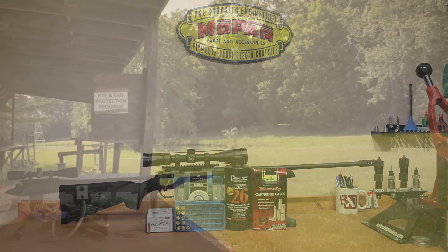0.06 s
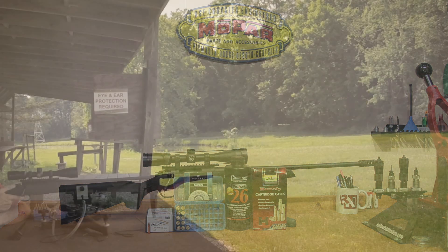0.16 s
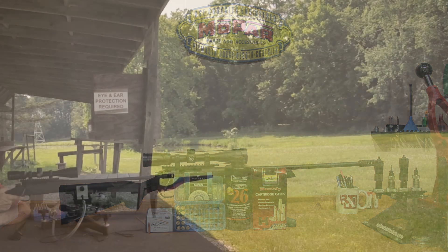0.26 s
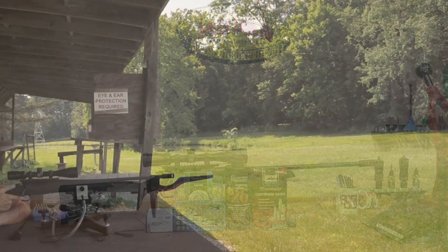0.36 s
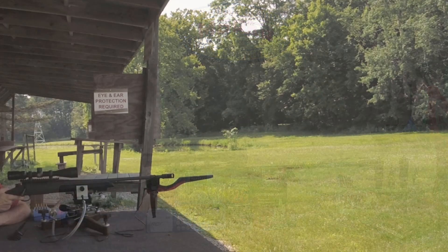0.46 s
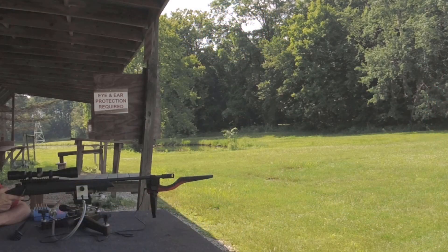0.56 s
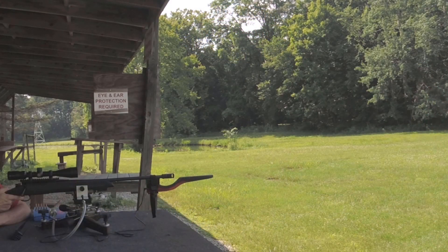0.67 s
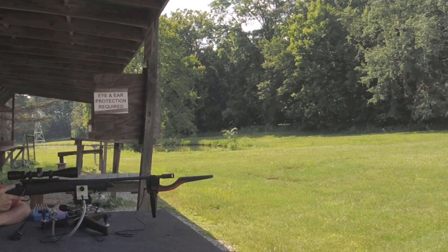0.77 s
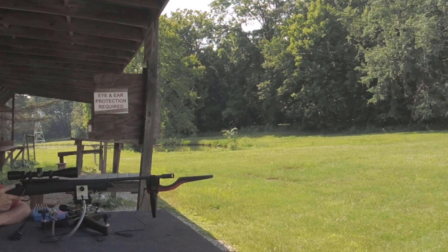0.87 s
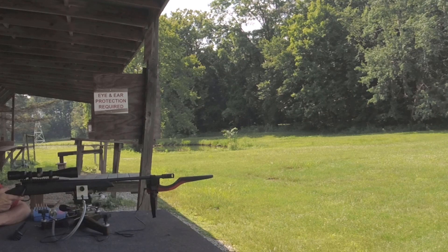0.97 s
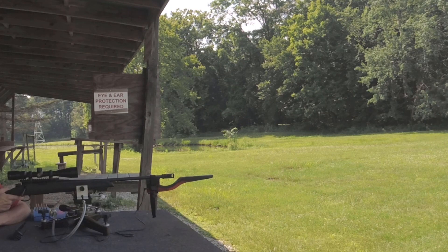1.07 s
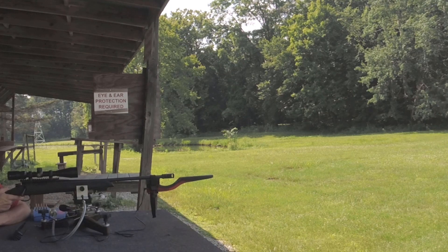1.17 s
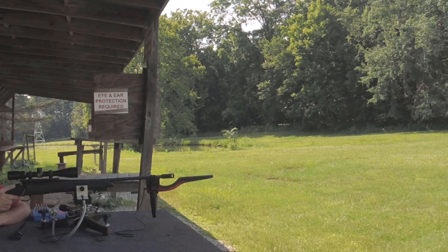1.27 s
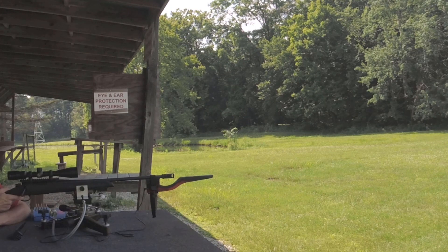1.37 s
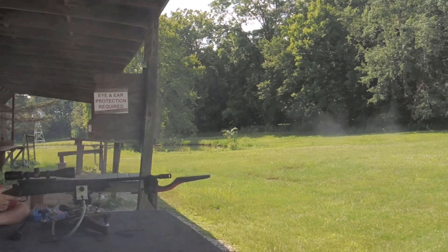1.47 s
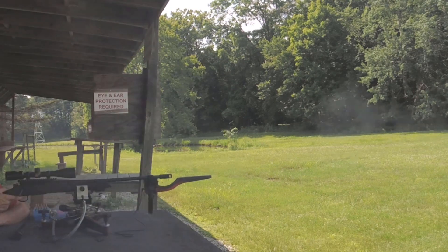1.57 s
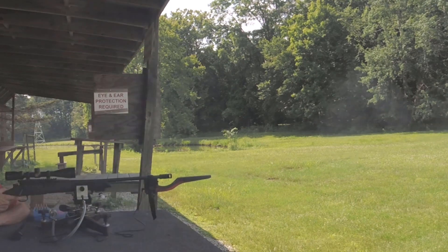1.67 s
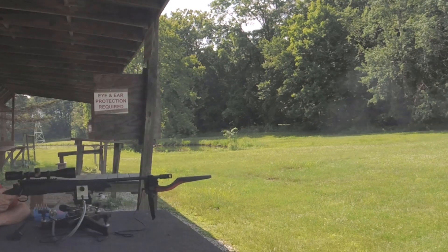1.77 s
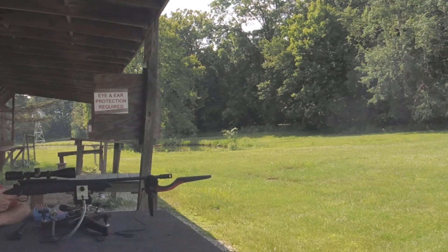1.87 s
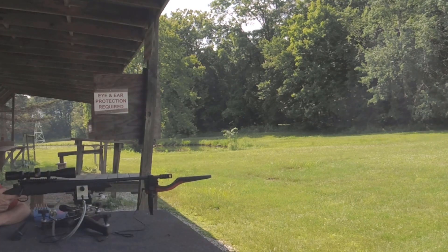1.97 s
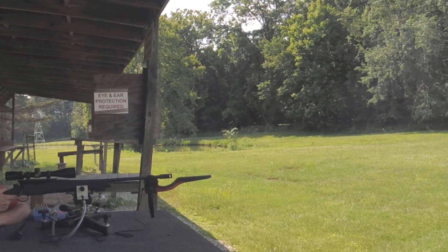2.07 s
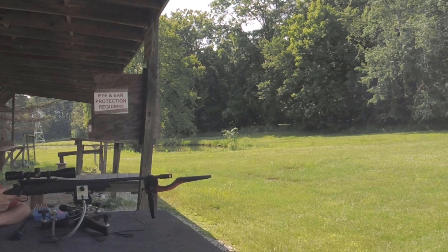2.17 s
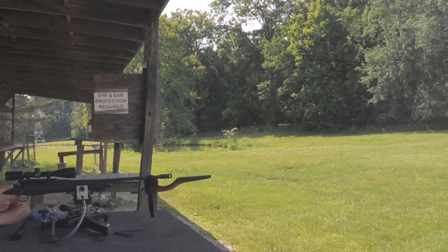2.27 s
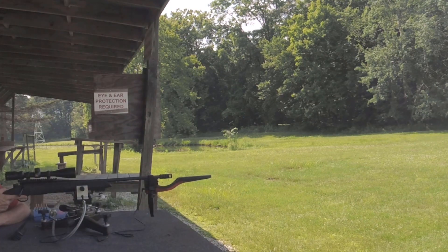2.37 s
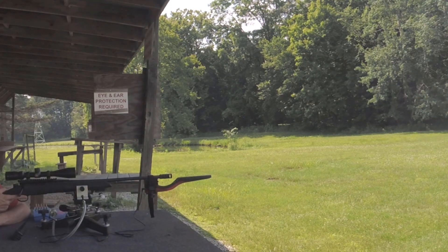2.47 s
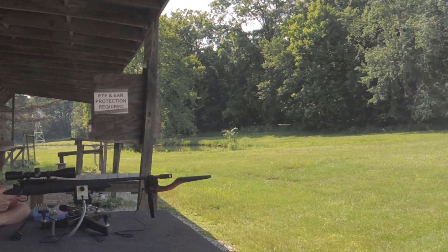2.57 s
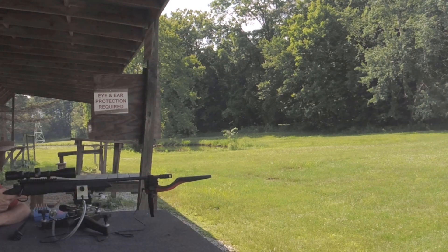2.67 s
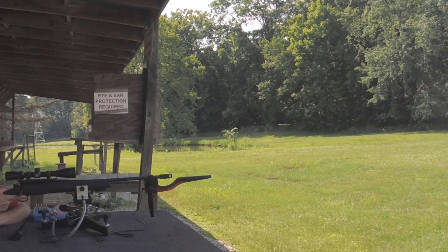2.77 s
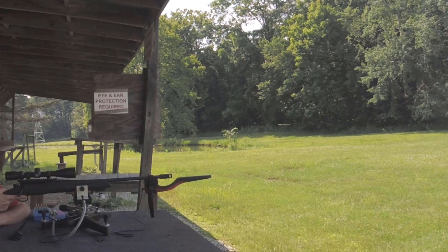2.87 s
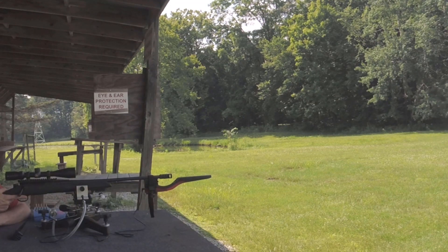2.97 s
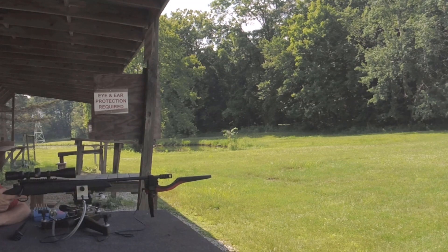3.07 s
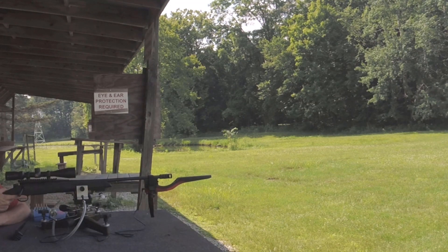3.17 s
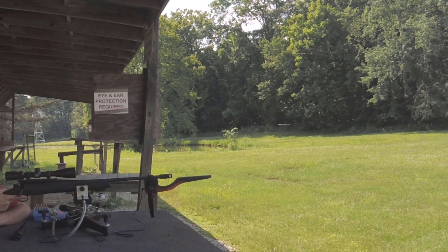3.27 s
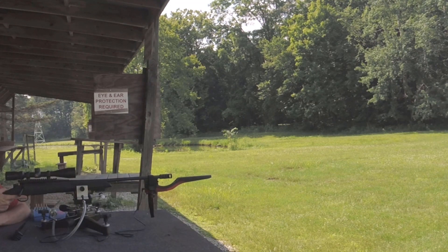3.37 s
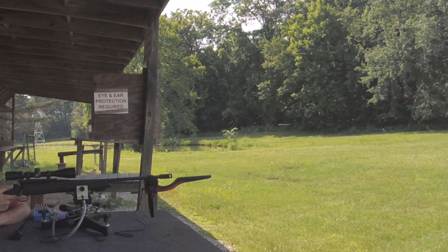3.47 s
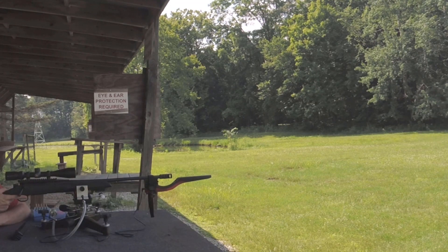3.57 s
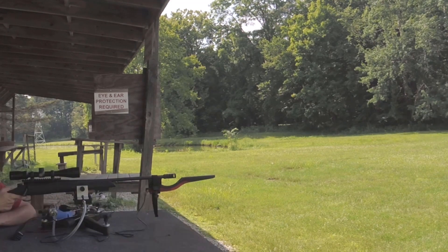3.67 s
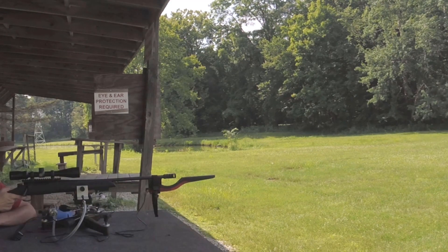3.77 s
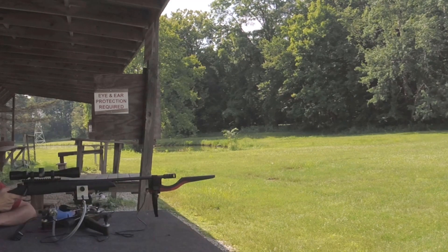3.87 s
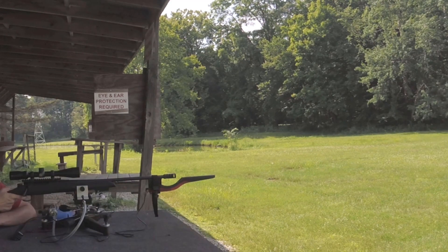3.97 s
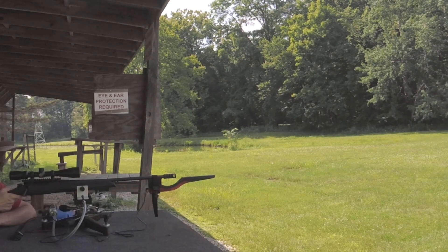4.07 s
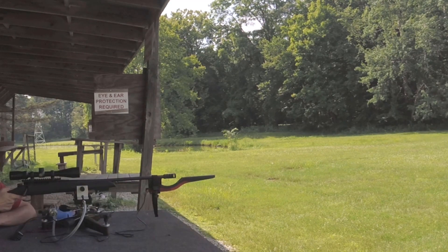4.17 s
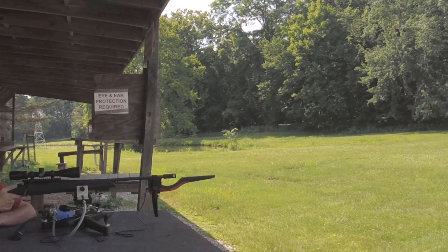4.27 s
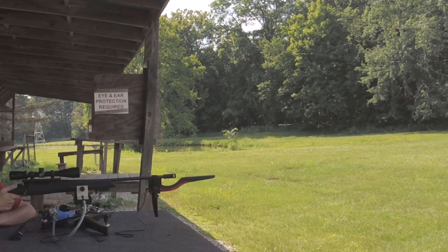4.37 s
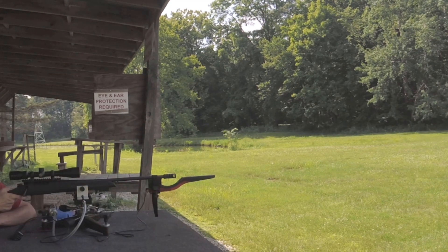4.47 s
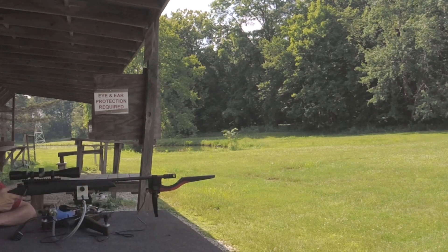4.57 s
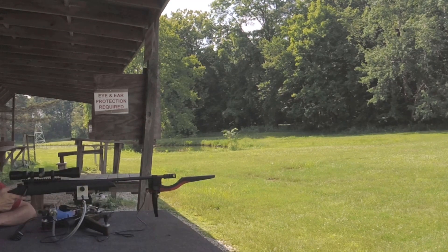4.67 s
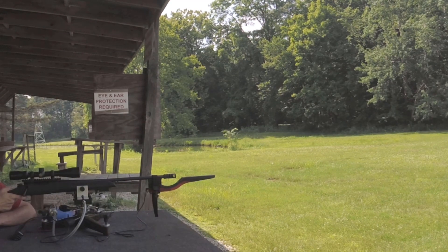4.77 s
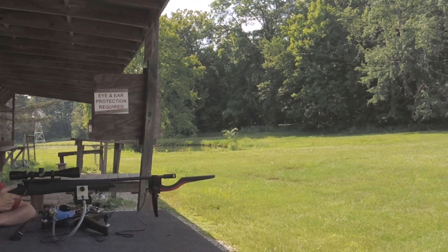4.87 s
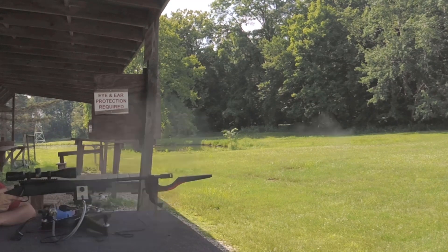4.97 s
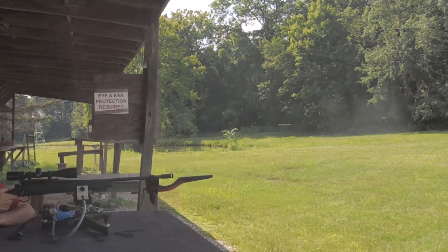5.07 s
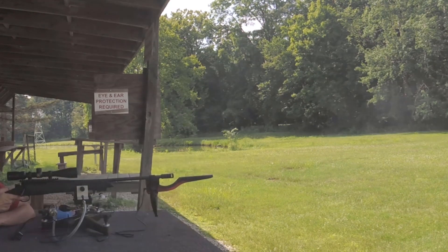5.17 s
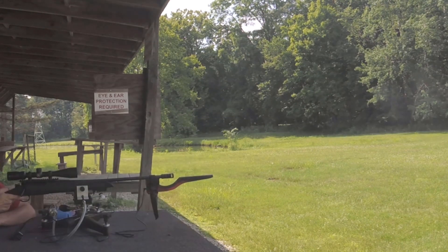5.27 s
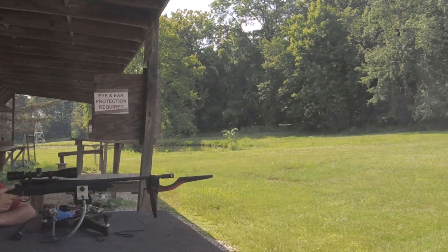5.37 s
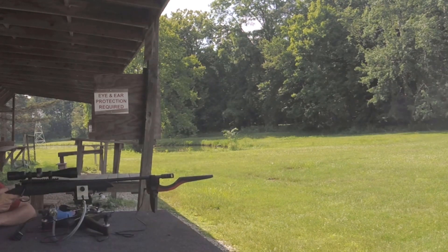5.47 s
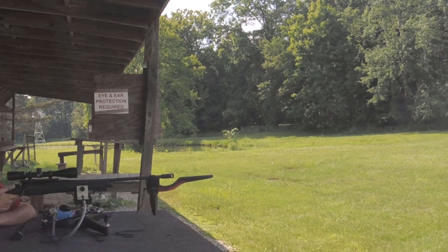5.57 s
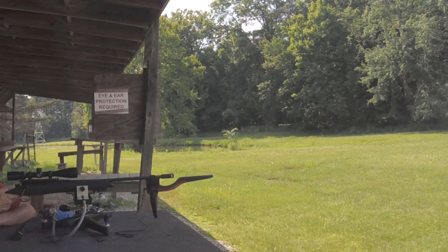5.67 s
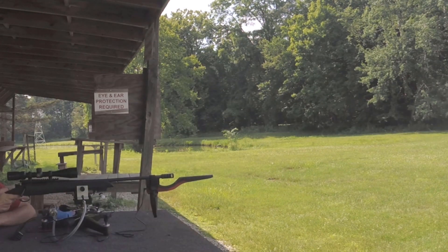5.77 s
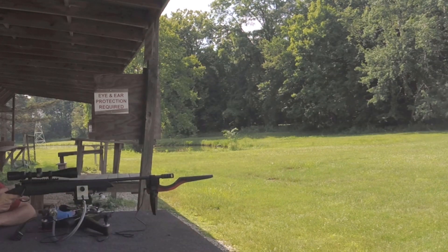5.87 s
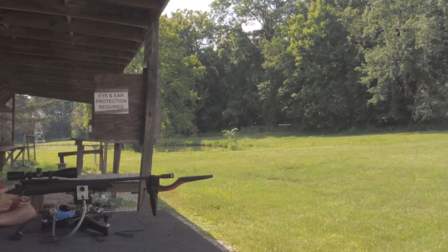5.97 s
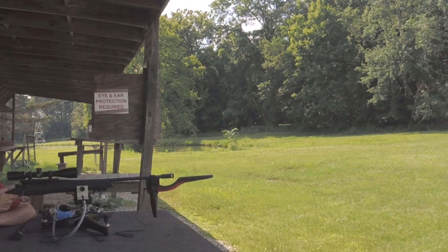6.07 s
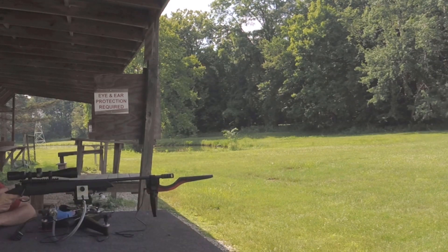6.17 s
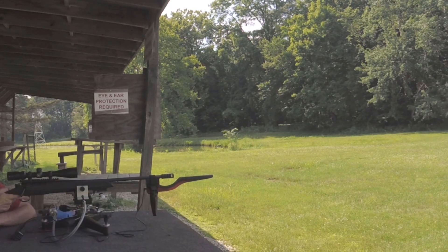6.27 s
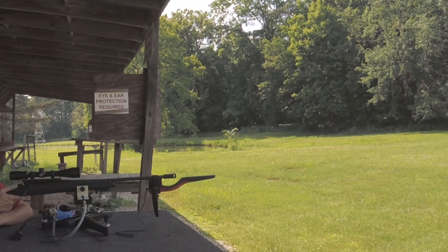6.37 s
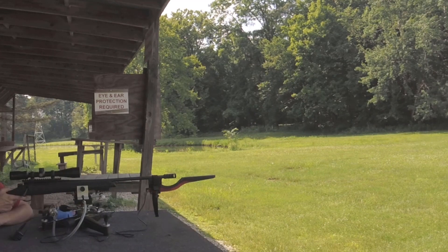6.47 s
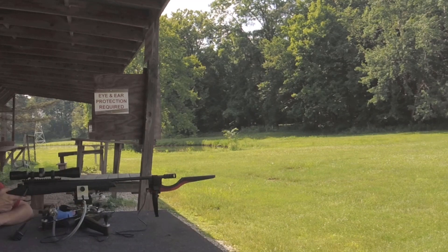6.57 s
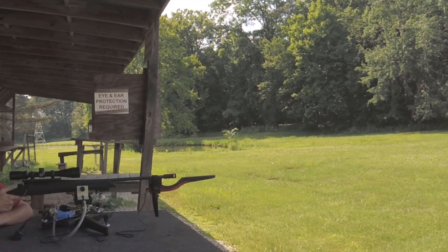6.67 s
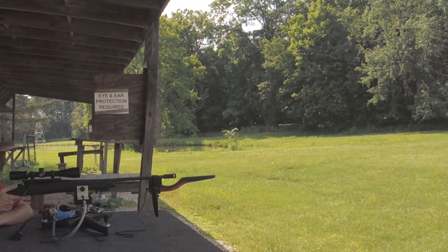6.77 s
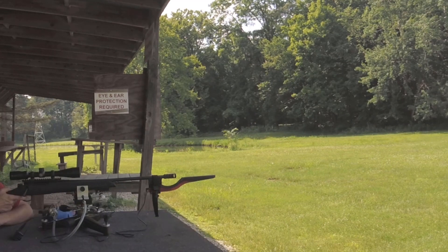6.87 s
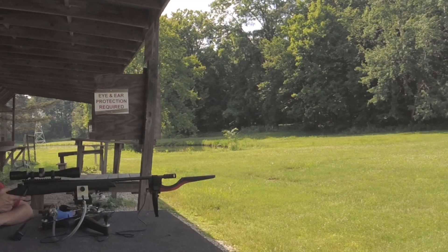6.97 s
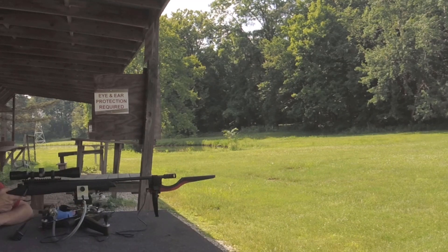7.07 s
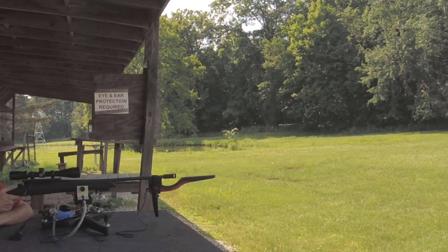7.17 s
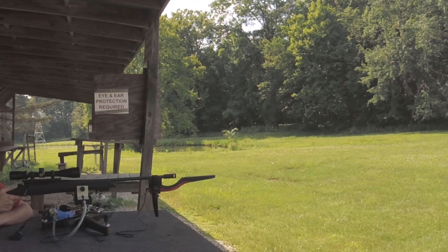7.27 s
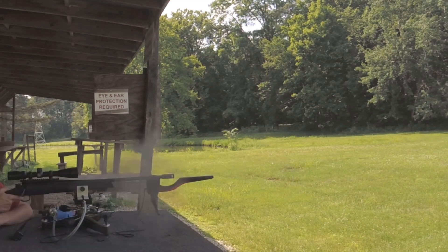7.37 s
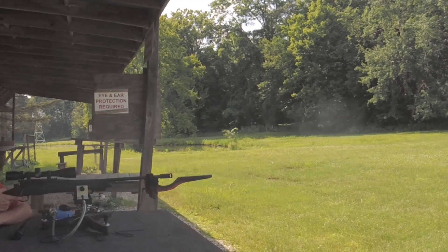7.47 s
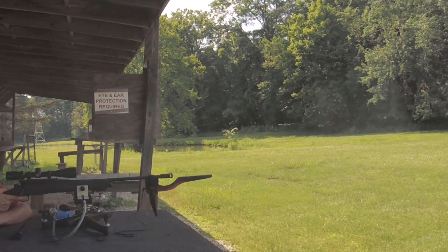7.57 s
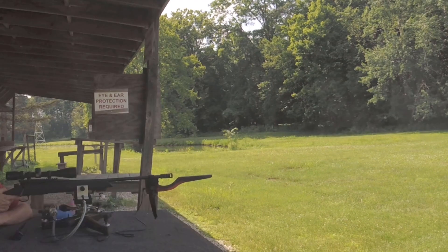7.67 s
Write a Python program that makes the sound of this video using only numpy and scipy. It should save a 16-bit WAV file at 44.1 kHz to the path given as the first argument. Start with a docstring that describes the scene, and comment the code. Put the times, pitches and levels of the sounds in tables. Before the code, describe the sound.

Mono, close to a rifle bench under a wooden shelter facing meadow and woods. The first 1.4 s are very quiet: thin hiss dipping at the start, a soft air murmur, short falling chirps, gliding whistles and faint insect tones. Just before 1.45 s, dry ticks, a rapid pulsed buzz and a low throb last a few hundredths of a second, then a bright, hard crack. Bench and roof ring briefly; scatter decays fast, the tree line answers about 0.3 s later, and a low roll trails away. Background stays sunk, with a low hum swelling from 2.5 s. At 3.7 s the air returns abruptly, with faint twittering and whistles until 4.9 s. A second, duller crack lands at 5.0 s with the same echoes. Background jumps back at 6.4 s with a faint hum and thin whine; the third crack at 7.4 s is cut off in its tail.

```python
"""Rifle shots on a meadow range

Three shots from a bench under a wooden shelter, facing a meadow edged by woods.
Ticks, a low throb and a pulsed buzz lead into each crack, a noise burst that rings bench and roof.
Banded noise makes the shelter's scatter, the tree-line echo and the far roll; a limiter flattens the peaks.
Around the shots: noise for hiss and insects, gliding tones for birds, wavering overtones for hums and a whine.
The background sinks just before each crack, creeps back and twice returns abruptly; it also dips at the start."""
import sys
import numpy as np
from scipy import signal
from scipy.fft import rfft, irfft
from scipy.io import wavfile
from scipy.ndimage import uniform_filter1d, minimum_filter1d

SR = 44100
rng = np.random.default_rng(int(sys.argv[2]) if len(sys.argv) > 2 else 0)


def wrap_up_sound(samples):
    """Save the sound to the file named by the first command line argument, as 16-bit audio."""
    columns = np.atleast_2d(samples).T
    # keep every value between -1 and 1, then stretch to whole-number steps
    tamed = np.clip(columns, -1, 1)
    steps = np.round(tamed * 32767).astype(np.int16)
    wavfile.write(sys.argv[1], SR, steps)


N = 340011

# relative spectrum of the crack and the ticks: pitch_hz [Hz], level_db [dB]
CRACK_COLOUR = [(200, -7), (900, 2), (1400, 1.5), (2000, 4), (4000, 3), (5200, -3), (6500, -2), (8500, -3),
                (11000, -15), (13000, -20.5), (15500, -31.5)]
PULSE_GAP_S = 0.00535  # pace of buzz and ticks


def amp(db):
    """Decibels to gain."""
    return 10 ** (np.asarray(db) / 20)


def unit(x):
    """Scale to rms 1."""
    return x / np.sqrt(np.mean(x ** 2))


def level_at(points, hz):
    """Gain at a frequency, read from (Hz, dB) points on a log frequency axis."""
    table_hz, db = np.transpose(points)
    return amp(np.interp(np.log(hz), np.log(table_hz), db))


def noise(points, size):
    """Noise of rms 1 with a spectrum of (Hz, dB) points."""
    f = np.maximum(np.fft.rfftfreq(size, 1 / SR), 1)
    spectrum = rfft(rng.standard_normal(size)) * level_at(points, f)
    return unit(irfft(spectrum, size))


def band(hz, width_hz, size):
    """Noise of rms 1 in a bell-shaped band."""
    f = np.fft.rfftfreq(size, 1 / SR)
    bell = np.exp(-2 * ((f - hz) / width_hz) ** 2)
    return unit(irfft(rfft(rng.standard_normal(size)) * bell, size))


def walk(rate_hz):
    """Slow random wander of rms 1, mostly slower than the given rate."""
    return band(0, rate_hz, N)


def burst(points, envelope):
    """A short noise burst with the envelope's rms, its spectrum evened out to (Hz, dB) points."""
    size = len(envelope)
    f = np.maximum(np.fft.rfftfreq(size, 1 / SR), 1)
    x = rng.standard_normal(size)
    # keep the phases of the enveloped noise, which hold its timing, and reset the levels
    for _ in range(4):
        phase = np.angle(rfft(x * envelope))
        x = irfft(level_at(points, f) * np.exp(1j * phase), size)
    x = x * np.minimum(10 * envelope, 1)  # silence the far tails
    return unit(x) * np.sqrt(np.mean(envelope ** 2))


def gate(t, start, end, edge=0.0027):
    """1 between two times, with short ramps inside them."""
    return np.clip((t - start) / edge, 0, 1) * np.clip((end - t) / edge, 0, 1)


def add(out, at, x):
    """Mix x into out from a time on."""
    i = int(round(at * SR))
    out[i:i + len(x)] += x[:len(out) - i]


def background(drop_db=-37, drop_s=0.054, return_db_per_s=11.0, flutter_db=-0.1, floor_db=-94,
               lull_db=-90.5, lull_rise_db_per_s=19, lull_top_db=-58):
    """Hiss and distant traffic murmur sink and creep back, while a low rumble swells in the lull."""
    # stretches, each lasting until the next: start_s [s], drop_s [s], air_db [dB rms], rumble_db [dB rms],
    # both levels before the drop and flutter
    stretches = [(0, 0.09, -69.5, -69.5), (0.141, 1.41, -56.5, -84), (3.675, 4.963, -60, -100),
                 (6.38, 7.382, -54.5, -91)]
    # relative spectra of the air in turn and of the rumble: pitch_hz [Hz], level_db [dB]
    thin_air = [(100, 3), (1500, -31), (2500, -3), (4800, -6), (5600, -12), (15000, -15)]
    air_a = [(30, -34.5), (89, -37.5), (108, -19), (167, 0.5), (260, -12.5), (460, -23.5), (800, -26.5),
             (2000, -32), (3200, -35.5), (4500, -47.5), (5800, -45.5), (6700, -35.5), (11500, -43.5),
             (15000, -44.5)]
    air_b = [(30, -23.5), (108, -28.5), (135, 3), (300, -11.5), (520, -16), (1100, -21), (3500, -29.5),
             (4600, -43.5), (5600, -39.5), (6800, -29), (9500, -32.5), (11800, -39), (13000, -35.5),
             (15000, -38)]
    air_c = [(30, -29), (110, -41.5), (148, 0.5), (185, -3.5), (260, -13.5), (520, -21), (1300, -24.5),
             (2450, -26), (3500, -37), (4800, -46.5), (5800, -46.5), (6800, -37), (11500, -45),
             (15000, -45)]
    rumble_colour = [(20, -3), (50, 0.5), (110, 2.5), (200, -12), (400, -16), (1000, -22), (3000, -44.5),
                     (8000, -59), (15000, -49.5)]
    t = np.arange(N) / SR
    rumble = noise(rumble_colour, N)
    ends = [row[0] for row in stretches[1:]] + [N / SR]
    # a steady faint hiss from the second stretch on
    out = amp(floor_db) * noise([(100, 2.0), (15000, -18)], N) * gate(t, ends[0], ends[-1])
    colours = (thin_air, air_a, air_b, air_c)
    for (start, drop, air_db, rumble_db), end, colour in zip(stretches, ends, colours):
        since = t - drop
        sunk_db = np.minimum(drop_db + return_db_per_s * since, 0) * np.clip(since / drop_s, 0, 1)
        air = amp(air_db) * noise(colour, N) + amp(rumble_db) * rumble
        out += air * gate(t, start, end) * amp(sunk_db + flutter_db * walk(8))
        if start > 0:
            swell_db = np.minimum(lull_db + lull_rise_db_per_s * since, lull_top_db)
            out += rumble * gate(t, drop, end) * amp(swell_db)
    return out


def twitter(from_s=3.7, to_s=4.85, centre_hz=3468, db=-80.5, length_s=0.05,
            spread=0.14, glide=0.12, count=8):
    """Scattered short notes that glide up or down: (s, length s, start Hz, end Hz, dB)."""
    notes = []
    for k, (when, pitch, slope) in enumerate(rng.random((count, 3))):
        at = from_s + (to_s - from_s) * (k + when) / count  # one at random in each equal slot
        hz = centre_hz * (1 + spread * (2 * pitch - 1))
        notes.append((at, length_s, hz, hz * (1 + glide * (2 * slope - 1)), db))
    return notes


def birds(bend=2.2, waver=0.0029, wet_db=0, t60=0.3):
    """Chirps, slurs, whistles and twitter: gliding tones, blurred by the trees they come from."""
    # one bird's short falling chirp, another's high downward slur: start_s [s], level_db [dB before swell, blur]
    chirp_times = [(0.324, -73), (0.585, -72), (0.87, -74), (1.204, -74)]
    slur_times = [(3.415, -94), (4.65, -81)]
    # short and longer gliding whistles: start_s [s], length_s [s], start_hz [Hz], end_hz [Hz],
    # level_db [dB before swell and blur]
    whistles = [(0.145, 0.28, 3340, 3880, -77), (0.44, 0.12, 3800, 4020, -73.5),
                (.29, 0.13, 3615, 3584, -72), (0.37, 0.15, 3070, 3027, -72), (4.15, 0.354, 3375, 3350, -84),
                (4.685, 0.088, 1870, 1990, -75), (4.86, .11, 4030, 4480, -85)]
    out, wobble = np.zeros(N), 1 + waver * walk(80)
    chirps = [(at, 0.044, 3000, 2520, db) for at, db in chirp_times]  # length s, start Hz, end Hz
    slurs = [(at, 0.11, 6250, 5400, db) for at, db in slur_times]
    for at, length, start_hz, end_hz, db in chirps + slurs + list(whistles) + twitter():
        u = np.linspace(0, 1, int(length * SR))
        # the glide is steepest at the start of the note
        hz = (end_hz + (start_hz - end_hz) * (1 - u) ** bend) * wobble[int(at * SR):][:len(u)]
        swell = np.sqrt(2 * abs(np.sin(np.pi * u)))
        add(out, at, amp(db) * swell * np.sin(2 * np.pi * np.cumsum(hz) / SR))
    t = np.arange(SR // 2) / SR
    trees = rng.standard_normal(len(t)) * np.exp(-np.log(1000) * t / t60)
    blur = signal.fftconvolve(out, trees / np.linalg.norm(trees))[:N]
    return out + amp(wet_db) * blur


def insects(width_hz=45, from_s=0.22, to_s=1.41):
    """Thin flickering tones from the meadow: narrow noise bands, ending just before the first crack."""
    # singing tones: pitch_hz [Hz], level_db [dB rms]
    tones = [(3127, -82.5), (2410, -82.5)]
    t = np.arange(N) / SR
    song = sum(amp(db) * band(hz, width_hz, N) for hz, db in tones)
    return gate(t, from_s, to_s) * song


def throb(hz=140, db=-11, full_s=0.02, curve=1.4):
    """A low tone that swells over the last few hundredths of a second before the crack."""
    lead = 0.0435  # s ahead of the crack
    t = np.arange(int((lead + 0.002) * SR)) / SR
    swell = np.minimum(t / full_s, 1) ** curve
    fade = np.clip((t[-1] - t) / 0.0056, 0, 1)
    return lead, amp(db) * swell * fade * np.cos(2 * np.pi * hz * t)


def ticks(db=-28, decay_s=0.0015, body_db=-34, body_s=0.028, later_db=-9):
    """Two dry ticks and two softer ones open the buzz at the same pace, each with a dull body."""
    body_colour = [(70, -21.5), (250, -3.5), (550, -2), (1500, -9), (4000, -24.0), (15000, -49)]  # Hz, dB
    t = np.arange(4096) / SR
    rows = []
    for k in range(5, 9):  # pulse gaps ahead of the crack
        tick = amp(db + later_db * (k < 7)) * burst(CRACK_COLOUR, np.exp(-t / decay_s))
        body = noise(body_colour, len(t)) * np.exp(-t / body_s)
        rows.append((k * PULSE_GAP_S, tick + amp(body_db) * body))
    return rows


def buzz(strong_db=-24, weak_db=-28, spread_s=0.0039, rough=0.55,
         zing_hz=6200, zing_db=-23, zing_s=0.002, early_db=-11):
    """Nearly alike pulses, strong and weak in turn, the earliest two fainter; strong ones carry a thin zing."""
    # relative spectrum of a pulse: pitch_hz [Hz], level_db [dB]
    pulse_colour = [(150, -0.5), (600, -7.5), (1200, -10), (1900, 4), (2700, -1), (3400, 0), (3900, 6),
                    (4400, -7.5), (5500, -13), (7500, -27.5), (11000, -35.5), (15000, -42.5)]
    t = np.arange(-512, 512) / SR  # centred on the pulse
    envelope = np.exp(-abs(t) / spread_s) * np.hanning(len(t))
    common = burst(pulse_colour, envelope)
    zing = np.sin(2 * np.pi * zing_hz * t) * np.exp(-(t / zing_s) ** 2)
    rows = []
    for k in range(7):  # pulse gaps ahead of the crack
        pulse = (common + rough * burst(pulse_colour, envelope)) / np.hypot(1, rough)
        if k % 2:
            pulse = amp(weak_db) * pulse
        else:
            pulse = amp(strong_db) * pulse + amp(zing_db) * zing
        rows.append((k * PULSE_GAP_S - t[0], pulse * amp(early_db * (k > 4))))
    return rows


def blast(bright_db, crack_db=4.0, crack_s=0.0014, ring_lag_s=0.0005):
    """The muzzle blast: a sharp burst of gas noise of given brightness, then the ring of bench and roof."""
    # decaying modes of bench and roof: pitch_hz [Hz], level_db [dB], t60_s [s]
    modes = [(157, -12.5, 0.082), (242, -31, 0.4), (296.5, -42, 0.9), (385, -29.5, 0.21),
             (432.6, -32.5, 0.25), (507, -3, 0.013), (886.5, -1, 0.0067), (2115, -16.5, 0.0093)]
    t = np.arange(32768) / SR
    late = np.maximum(t - ring_lag_s, 0)
    ring = sum(amp(db) * np.sin(2 * np.pi * hz * late) * np.exp(-np.log(1000) * late / t60)
               for hz, db, t60 in modes)
    front = np.minimum(t / 0.0001, 1)
    colour = [(hz, db + bright_db * np.log2(hz)) for hz, db in CRACK_COLOUR]
    return amp(crack_db) * burst(colour, front * np.exp(-t / crack_s)) - ring


def reflections(shelter_s=0.0087, build_s=0.00015, woods_spread=0.22, patchy_db=1.2, size=131072):
    """Roof and posts scatter the blast at once, the tree line answers later, and the far land rolls on."""
    # levels per half octave before their envelopes, for shelter, woods and far land:
    # pitch_hz [Hz], level_db [dB rms]
    shelter_colour = [(30, -51.5), (55, -42), (90, -46.5), (160, -24), (300, -25.5), (700, -22),
                      (1800, -25.5), (3500, -31.5), (7700, -39.5), (11000, -49)]
    woods_colour = [(30, -74), (55, -59), (92, -68.5), (152, -48), (300, -62), (700, -54.5), (1800, -67.5),
                    (3500, -65.5), (7700, -79.5), (11000, -104)]
    roll_colour = [(30, -91), (55, -81.5), (92, -82), (152, -64.5), (300, -85), (700, -67.5), (1800, -74),
                   (2800, -70), (4200, -74), (7700, -83), (11000, -113)]
    # the tree line's answer; mid pitches reach deepest into the wood: pitch_hz [Hz], delay_s [s]
    woods_delay = [(150, 0.30), (800, 0.37), (3500, 0.31)]
    # distinct returns from downrange: delay_s [s], centre_hz [Hz], level_db [dB], decay_s [s]
    returns = [(.127, 3780, -59, .0015), (0.159, 325, -39.5, 0.0069)]
    # the shelter's scatter dies as a power of time, faster in the treble
    fall_at_1khz, fall_per_octave = 1.496, 0.12
    # the far roll lasts long in the bass; the air shortens it towards the treble
    bass_t60_s, treble_t60_s, air_damp_hz = 13.9, 1.4, 1740
    t = np.arange(1, size + 1) / SR
    clumps = amp(patchy_db * band(0, 57, size))  # trunks and crowns answer in clumps
    out = np.zeros(size)
    delay_hz, delays = np.transpose(woods_delay)
    for hz in 30 * 2 ** (np.arange(19) / 2):  # half-octave bands
        fall = fall_at_1khz + fall_per_octave * np.log2(hz / 1000)
        delay = np.interp(np.log(hz), np.log(delay_hz), delays)
        t60 = treble_t60_s + (bass_t60_s - treble_t60_s) * np.exp(-(hz / air_damp_hz) ** 2)
        build = 1 - np.exp(-t / build_s)
        shelter = level_at(shelter_colour, hz) * build * (1 + t / shelter_s) ** -fall
        # trees at many depths smear their echo into a swell
        smear = np.exp(-0.5 * (np.log(t / delay) / woods_spread) ** 2)
        woods = level_at(woods_colour, hz) * clumps * smear
        rise = np.minimum(t / delay, 1) ** 2
        roll = level_at(roll_colour, hz) * rise * np.exp(-np.log(1000) * (t - delay) / t60)
        out += band(hz, 0.4 * hz, size) * np.sqrt(shelter ** 2 + woods ** 2 + roll ** 2)
    for delay, hz, db, decay in returns:
        envelope = t / decay * np.exp(1 - t / decay)
        add(out, delay, amp(db) * band(hz, hz / 2, size) * envelope)
    return out * np.minimum(t[-1] - t, 1)  # fade over the last second


def rifle():
    """Every shot meets the same shelter and the same woods."""
    # shots: crack_s [s], blast_db [dB], brightness [dB per octave], throb_db [dB], buzz_db [dB], tick_db [dB]
    shots = [(1.4529, 0, 2, 0, -2.5, -2.5), (5.0048, 1, -2, -0.5, 0, -0.5), (7.4252, -0.5, -1, -2.8, 2, 0)]
    out = np.zeros(N)
    echoes = reflections()
    lead, low = throb()
    for at, blast_db, bright_db, throb_db, buzz_db, tick_db in shots:
        add(out, at, amp(blast_db) * blast(bright_db))
        add(out, at, amp(blast_db) * echoes)
        add(out, at - lead, amp(throb_db) * low)
        for ahead, pulse in buzz():
            add(out, at - ahead, amp(buzz_db) * pulse)
        for ahead, tick in ticks():
            add(out, at - ahead, amp(tick_db) * tick)
    return out


def hums(waver=0.00477, flicker_db=2, count=5):
    """Low hums and a whine: a tone and its overtones wavering together in pitch, each flickering in level."""
    # tones: start_s [s], end_s [s], pitch_hz [Hz], level_db [dB peak of the fundamental at the end,
    # before flicker], rise [dB per s], overtones [dB per octave]
    tones = [(2.5, 3.671, 116.2, -46.5, 21, -35), (3.675, 4.957, 67.5, -76, 0, -26.5),
             (3.675, 4.955, 136.2, -62.5, 1.5, -14), (6.38, 7.395, 419.5, -62.5, 1.5, -5.5),
             (6.386, 7.39, 2454, -69, 3, -39)]
    t = np.arange(N) / SR
    out = np.zeros(N)
    turns = np.cumsum(1 + waver * walk(23.3)) / SR  # wavering time
    flickers = [amp(flicker_db * walk(7.3)) for _ in range(count)]
    for start, end, hz, db, rise_db, overtone_db in tones:
        on = (t > start) & (t < end)
        tone = 0
        for k, flicker in enumerate(flickers, 1):
            partial = np.sin(2 * np.pi * k * hz * turns[on])
            tone = tone + amp(overtone_db * np.log2(k)) * flicker[on] * partial
        out[on] += amp(db + rise_db * (t[on] - end)) * gate(t[on], start, end) * tone
    return out


def scene():
    """The whole range mixed to one channel."""
    return (rifle() + background() + hums() + insects() + birds())[None]


def record(dry):
    """A very fast limiter flattens the cracks; a steep low-pass cuts the top."""
    ceiling, hold, top_hz = 0.34, 5, 15300  # full scale, samples, Hz
    gain = ceiling / np.maximum(abs(dry), ceiling)
    gain = uniform_filter1d(minimum_filter1d(gain, hold), hold)
    low_pass = signal.ellip(8, 0.2, 70, top_hz, fs=SR, output="sos")
    return signal.sosfilt(low_pass, dry * gain)


dry = scene()
out = record(dry)
wrap_up_sound(out)
```